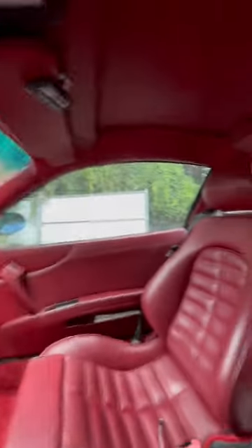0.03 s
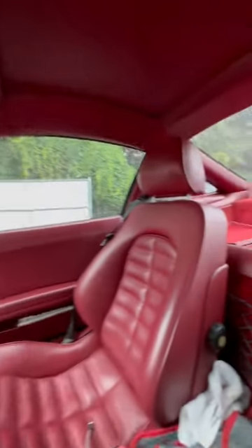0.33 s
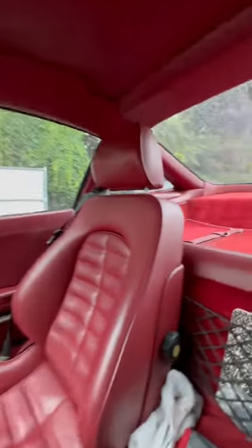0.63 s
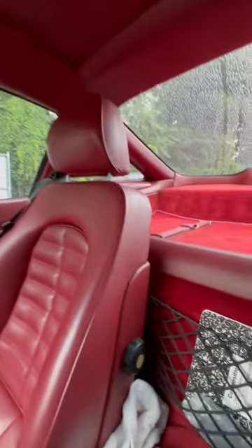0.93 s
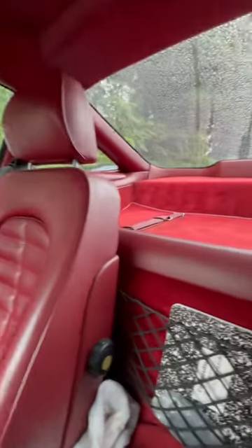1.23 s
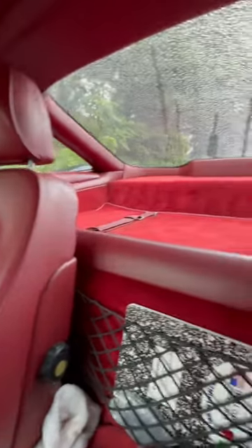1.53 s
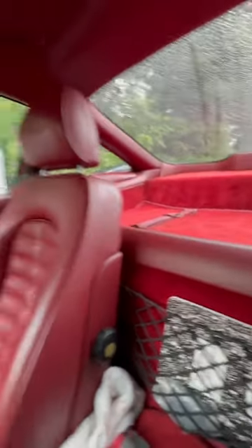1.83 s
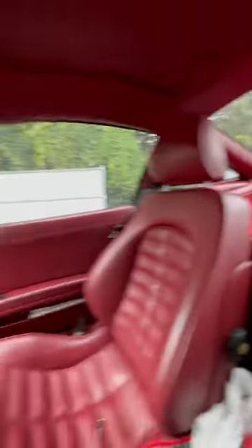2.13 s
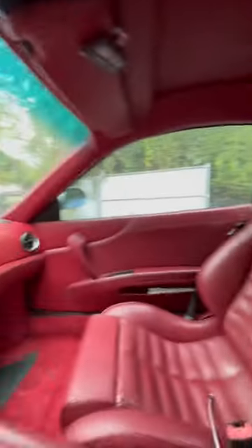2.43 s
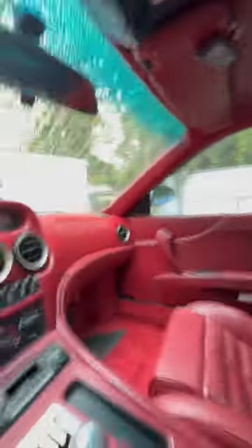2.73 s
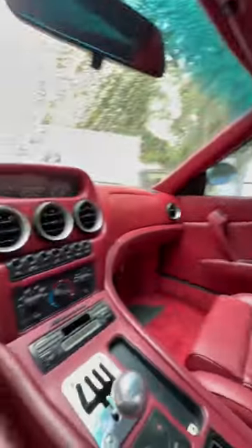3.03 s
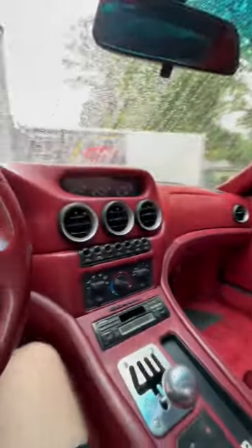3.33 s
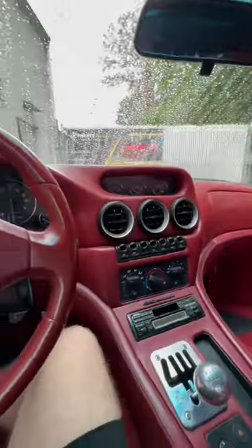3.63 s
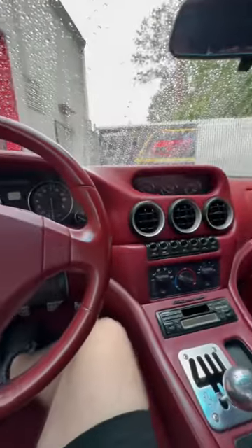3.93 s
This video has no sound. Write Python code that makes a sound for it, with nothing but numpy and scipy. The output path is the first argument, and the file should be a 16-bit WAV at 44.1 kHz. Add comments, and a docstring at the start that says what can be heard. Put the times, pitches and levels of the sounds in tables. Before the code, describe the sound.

Light rain patters on a parked car's roof over a low rumble, with one seat thump.

```python
"""Light rain on a parked car

A low rumble and a far engine come through the closed doors. Drops patter dully on the roof
over a faint wash and hiss, and the heavy ones make the roof ring. Someone turns in the
leather seat: a soft thump with a clack of trim, a short rustle and a few small ticks."""
import sys
import numpy as np
from scipy import signal
from scipy.fft import rfft, irfft, next_fast_len
from scipy.io import wavfile
from scipy.ndimage import map_coordinates

SR = 44100
rng = np.random.default_rng(int(sys.argv[2]) if len(sys.argv) > 2 else 0)


def pcm_store(signal):
    """Save signal as 16-bit PCM."""
    levels = np.round(np.clip(np.atleast_2d(signal), -1, 1) * 32767)
    wavfile.write(sys.argv[1], SR, levels.astype(np.int16).T)


N = 176400
T = np.arange(N) / SR


def amp(db):
    """Turn decibels into a gain."""
    return 10 ** (np.asarray(db) / 20)

def unit(x):
    """Scale a sound to an average (rms) strength of 1."""
    return x / np.sqrt(np.mean(x ** 2) + 1e-20)

def along(points, hz):
    """Read between a table's frequencies, on a log scale."""
    f, v = np.transpose(points)
    return np.interp(np.log(hz + 1), np.log(f + 1), v)

def curves(rows):
    """One value per sample for each column after the time."""
    times, *columns = np.transpose(rows)
    return [np.interp(T, times, c) for c in columns]

def wobble(per_s):
    """A smooth curve through per_s random values a second."""
    return map_coordinates(rng.standard_normal(int(N * per_s / SR) + 4), [T * per_s])

def filtered(x, response):
    """Turn each frequency up or down by response(hz)."""
    size = next_fast_len(N + SR // 2)
    return irfft(rfft(x, size) * response(np.fft.rfftfreq(size, 1 / SR)), size)[..., :N]

def colour(tone, hz):
    """The gain of a tone table, falling steeply above its last row."""
    return amp(along(tone, hz)) / (1 + (hz / (2 * tone[-1][0])) ** 4)

def struck(x, tone):
    """Give hits a tone that rings only after each hit (a minimum-phase filter)."""
    def response(hz):
        cepstrum = irfft(np.log(colour(tone, hz) + 1e-6))
        half = len(cepstrum) // 2
        cepstrum[1:half] *= 2
        cepstrum[half + 1:] = 0
        return np.exp(rfft(cepstrum))
    return filtered(x, response)

# How wide the cabin sounds (frequency [Hz], left-right difference gain [dB])
WIDTH = [(30, -47), (55, -60), (85, -38), (120, -25.5), (190, -18), (300, -7.5), (450, 0.5), (620, 1),
         (850, 0.5), (1200, 3), (1600, 3.5), (2150, -3.5), (2700, 9), (3900, -1.5), (5000, 1.5),
         (6200, -2.5), (7500, 4.5), (9500, -2), (11000, 15)]
def spread(pair):
    """Two unrelated sounds become left and right: alike in the bass, apart in the treble."""
    mid, side = pair[0], filtered(pair[1], lambda hz: amp(along(WIDTH, hz)))
    return np.array([mid + side, mid - side])

def rush(tone):
    """Steady stereo noise with the given tone."""
    return unit(spread(filtered(rng.standard_normal((2, N)), lambda hz: colour(tone, hz))))

def drops(tone, per_s, spread_db):
    """Drops of random size land at random times."""
    hits = (rng.random(N) < per_s / SR) * amp(spread_db * np.clip(rng.standard_normal(N), -2, 2))
    return unit(spread(struck(hits * rng.choice([-1, 1], (2, N)), tone)))

def blows(rows, tone, rise_s, t60, tail_db, tail_t60):
    """Each blow is a noise burst with a weaker tail. A t60 is the seconds taken to fade 60 dB."""
    out, t = np.zeros((2, N + SR)), np.arange(SR // 3) / SR
    burst = amp(-60 * np.maximum(t - rise_s, 0) / t60)
    tail = amp(tail_db - 60 * t / tail_t60)
    shape = (1 - np.exp(-(t / rise_s) ** 2)) * (burst + tail)
    for start, db in rows:
        out[:, int(start * SR):][:, :len(t)] += amp(db) * shape * rng.standard_normal((2, len(t))) / 2
    gain = np.sqrt(np.mean(colour(tone, np.linspace(0, SR / 2, 4096)) ** 2))
    return spread(struck(out[:, :N], tone)) / gain

# Loudness of the rumble and the cabin's boom (time [s], relative level [dB])
RUMBLE_LEVEL = [(0, -49.5), (.2, -50.5), (.4, -48.5), (.75, -51.5), (.95, -46), (1.4, -53), (2.0, -47),
                (2.2, -49), (2.6, -52.5), (2.78, -47), (2.92, -57.5), (3.15, -52), (3.55, -52.5),
                (3.72, -46), (3.8, -52.5), (4, -56.5)]
BOOM_LEVEL = [(0.0, -60.5), (0.37, -69.5), (0.5, -60), (0.67, -64), (1.77, -63.5), (2.22, -63.5),
              (2.54, -61.5), (3.6, -67.5), (4.0, -63)]
# Their tones (frequency [Hz], gain [dB])
RUMBLE_TONE = [(18, -23), (30, -17), (40, -8.5), (54, .5), (64, -1.5), (74, -8), (86, -5), (100, -13),
               (125, -19), (200, -54)]
BOOM_TONE = [(75, -33), (110, -5), (135, 4), (175, -4.5), (210, -10.5), (300, -30)]
def traffic():
    """Low traffic noise comes through the closed doors and booms in the cabin."""
    rumble = amp(curves(RUMBLE_LEVEL)[0] + 1) * rush(RUMBLE_TONE)
    boom = amp(curves(BOOM_LEVEL)[0] + 3.5) * rush(BOOM_TONE)
    return rumble + boom

# The engine's hum (time [s], pitch [Hz], level [dB])
ENGINE_NOTE = [(0, 86.26, -76), (.5, 88.13, -58.5), (1.1, 88, -57), (1.65, 88.08, -55), (2.1, 84.5, -61.5),
               (2.6, 84, -66), (4, 83.34, -76.5)]
def far_engine():
    """A far engine hums one low, wavering note."""
    hz, db = curves(ENGINE_NOTE)
    phase = 2 * np.pi * np.cumsum(hz + 1.1 * wobble(8)) / SR
    return np.sqrt(2) * np.sin(phase) * amp(db + 1.5 * wobble(3.6))

# Loudness of the wash (time [s], relative level [dB])
WASH_LEVEL = [(0, -75.5), (1, -77), (2.4, -74), (2.9, -75), (3.3, -76.5), (3.7, -73.5), (4, -75.5)]
# Its tone (frequency [Hz], gain [dB])
WASH_TONE = [(200, -2), (350, 0.5), (480, -13), (640, -7.5), (780, 2.5), (920, 1), (1100, -2),
             (1300, -10.5), (1700, -17.5), (3000, -53)]
def rain_wash():
    """The rain outside blurs into a soft wash, a little to the right."""
    lean_right = amp([[-1], [1]])
    return amp(curves(WASH_LEVEL)[0] + 5 + 0.91 * wobble(12)) * rush(WASH_TONE) * lean_right

# Loudness of the hiss (time [s], relative level [dB])
HISS_LEVEL = [(0, -77), (.9, -78.5), (1.2, -78), (1.8, -79), (2.3, -77.5), (2.9, -76.5), (3.3, -77.5),
              (4, -79)]
# Its tone (frequency [Hz], gain [dB])
HISS_TONE = [(600, 0), (1300, -1), (1550, 2), (1750, .5), (1980, 7.5), (2130, 11), (2300, 4.5), (2550, -1),
             (3100, -2.5), (4000, 2.5), (4900, -2.5), (5150, 0.5), (6200, 3.5), (6700, 0), (7300, -5.5),
             (9200, -7), (10300, -13.5), (11300, -26.5)]
def rain_hiss():
    """Rain hisses outside while fine drops hit the glass."""
    fine_drops = amp(-7.5) * drops(HISS_TONE, per_s=150, spread_db=2.5)
    return amp(curves(HISS_LEVEL)[0] + 1.1 * wobble(10)) * unit(rush(HISS_TONE) + fine_drops)

# Loudness of the rain behind the seats (time [s], level [dB])
REAR_LEVEL = [(0, -68.5), (.6, -68.5), (1.2, -69), (1.9, -75.5), (2.4, -78.5), (2.9, -84.5), (4, -84.5)]
# Its tone (frequency [Hz], gain [dB])
REAR_TONE = [(300, -24), (450, -4), (620, 1), (760, -2), (1000, -4.5), (1300, -15.5), (2000, -44)]
def rear_window():
    """Rain on the rear window makes a hollow wash that fades away."""
    return amp(curves(REAR_LEVEL)[0] + wobble(18)) * rush(REAR_TONE)

# Loudness of the patter (time [s], relative level [dB])
PATTER_LEVEL = [(0, -59.5), (.22, -69), (.32, -59.5), (.48, -71), (.6, -62), (1.55, -63.5), (1.92, -69.5),
                (2.3, -66), (2.7, -65.5), (2.92, -69.5), (3.1, -74), (3.5, -79), (3.65, -67), (4, -71)]
# Its tone (frequency [Hz], gain [dB])
PATTER_TONE = [(130, -26.5), (210, 3.5), (275, 2), (320, -7), (400, -7.5), (480, -11), (600, -15),
               (900, -22.5), (1500, -38), (3000, -66.5)]
def roof_patter():
    """Small drops land dully on the roof, over noise of the same tone."""
    patter = drops(PATTER_TONE, per_s=77, spread_db=1) + amp(-1) * rush(PATTER_TONE)
    return amp(curves(PATTER_LEVEL)[0] - 0.67) * unit(patter)

# Heavy drops landing (time [s], relative level [dB])
TAPS = [(.012, -52), (.294, -51.5), (.343, -56.5), (.37, -61), (0.546, -43.5), (.563, -56.5), (.615, -54.5),
        (.665, -56), (.935, -54.5), (1.56, -53.5), (1.892, -59), (1.988, -57.5), (2.06, -55), (2.29, -58),
        (2.98, -61.5), (3.558, -52.5), (3.733, -59.5)]
# Their tone (frequency [Hz], gain [dB])
TAP_TONE = [(90, -22), (220, 1.5), (330, 2.5), (490, 2), (620, -11), (750, -11.5), (920, -12.5),
            (1200, -13.5), (1700, -32), (4000, -63.5)]
def heavy_drops():
    """Each heavy drop hits the roof with a dull tap."""
    return amp(-2.5) * blows(TAPS, TAP_TONE, rise_s=0.0022, t60=0.078, tail_db=-25, tail_t60=0.45)

# The roof's own notes (typical pitch [Hz], relative level [dB], time to fade 60 dB [s])
ROOF_NOTES = [(272, 1.5, .06), (363.4, 2.5, 0.088), (486, 6.5, 0.049)]
def roof_ring():
    """Every heavy drop rings the damped roof panel, at slightly different pitches."""
    out, t = np.zeros(N + SR), np.arange(SR // 4) / SR
    attack = 1 - np.exp(-t / 0.0022)
    for start, db in TAPS:
        for hz, level, t60 in ROOF_NOTES:
            pitch = hz * (1 + 0.071 * rng.standard_normal())
            fade = amp(db - 8 + level - 60 * t / t60)
            out[int(start * SR):][:len(t)] += attack * fade * np.sin(2 * np.pi * pitch * t)
    return out[:N]

# Rubs of the leather (peak time [s], rise [s], time to fade 60 dB [s], level [dB],
# centre frequency [Hz], width [octaves])
RUBS = [(1.896, 0.0055, 0.083, -75, 2880, 0.46), (1.914, .012, 0.073, -82, 2980, .5),
        (2.764, 0.035, 0.35, -69.5, 2800, 1.03), (2.775, 0.0045, .05, -65, 1530, 0.22),
        (2.851, 0.027, 0.36, -75.5, 7500, 0.43), (2.985, 0.023, 0.076, -67, 850, 0.49),
        (3.3, .012, .08, -79.5, 4930, 0.39), (3.84, 0.15, .7, -85.5, 3280, 0.62)]
def leather():
    """Leather rubs in short, grainy bands of noise that swell and die."""
    out = np.zeros((2, N))
    for peak, rise, fall, db, hz, width in RUBS:
        noise = rng.standard_normal((2, N))
        band = unit(filtered(noise, lambda f: np.exp(-.5 * (np.log2((f + 1) / hz) / width) ** 2)))
        swell = np.exp(-(np.minimum(T - peak, 0) / rise) ** 2)
        fade = amp(-60 * np.maximum(T - peak, 0) / fall)
        grain_db = 3.5 * wobble(330)
        out += amp(db + grain_db) * swell * fade * band
    return out

# Small ticks (time [s], relative level [dB])
TICKS = [(2.8865, -50), (3.626, -66), (3.637, -71), (3.7545, -73)]
# Their tone (frequency [Hz], gain [dB])
TICK_TONE = [(2500, -20), (3800, 11.5), (5500, 5.5), (7500, 9.5), (9200, 8.5), (11000, -7)]
def trim_ticks():
    """The trim, the cabin's lining, gives a few thin ticks."""
    return blows(TICKS, TICK_TONE, rise_s=0.0012, t60=.009, tail_db=-13, tail_t60=.16)

# Clacks of the trim (time [s], relative level [dB])
CLACKS = [(2.7148, -50), (2.7218, -42), (2.7245, -45), (2.7285, -42.5), (2.742, -56.5), (2.757, -56),
          (2.772, -54.5)]
# Their tone (frequency [Hz], gain [dB])
CLACK_TONE = [(300, 0), (580, 0), (780, 5.5), (1100, 1.5), (1450, 5), (2100, 1.5), (2900, -5), (3900, -6),
              (4600, -11.5), (5200, -3.5), (6500, -19), (9500, -8), (11500, -28)]
def trim_clacks():
    """The trim clacks in a quick cluster as the sitter turns."""
    return blows(CLACKS, CLACK_TONE, rise_s=0.00076, t60=.008, tail_db=-23, tail_t60=.28)

# The trim's own notes (pitch [Hz], relative level [dB], time to fade 60 dB [s])
TRIM_NOTES = [(760, 10, 0.046), (880, -1.5, 0.1), (1363, -1.5, 0.13), (1433, 3.5, 0.071), (1562, -6, .09),
              (1645, -12.5, 0.074), (2160, -4.5, 0.086), (2445, -2.5, 0.1), (2602, -6, 0.075),
              (2960, -11, 0.13), (3165, -6, 0.089), (3460, -7.5, .14), (3780, -11.5, 0.15),
              (4366, -11, 0.14), (4960, -13, .18)]
def trim_ring():
    """Every clack sets the trim ringing again."""
    out, t = np.zeros((2, N + SR)), np.arange(SR // 3) / SR
    for start, db in CLACKS:
        for hz, level, t60 in TRIM_NOTES:
            phase = rng.uniform(0, 2 * np.pi, (2, 1))
            fade = amp(db - 23 + level + rng.normal(0, 0.56) - 60 * t / t60)
            out[:, int(start * SR):][:, :len(t)] += fade * np.sin(2 * np.pi * hz * t + phase)
    return spread(out[:, :N])

# The seat's low notes (pitch [Hz], level [dB], time to fade 60 dB [s])
SEAT_NOTES = [(75.9, -38, 0.38), (141.2, -26.5, 0.049), (168, -33, 0.056)]
def seat_thump(start_s=2.711, rise_s=0.0072):
    """The seat thumps softly as someone turns in it."""
    t = np.maximum(T - start_s, 0)
    ring = sum(amp(db - 60 * t / t60) * np.sin(2 * np.pi * hz * t) for hz, db, t60 in SEAT_NOTES)
    return -ring * (1 - np.exp(-t / rise_s))

def scene():
    """Everything heard from the driver's seat."""
    background = traffic() + far_engine()
    rain = rain_wash() + rain_hiss() + rear_window() + roof_patter() + heavy_drops() + roof_ring()
    turning = leather() + trim_ticks() + trim_clacks() + trim_ring() + seat_thump()
    return background + rain + turning

# How the sound widens (time [s], centred below [Hz], left-right difference gain [dB])
MONO_BELOW = [(0, 716, -5), (1.0, 793, -6), (1.85, 686, -5.5), (2.2, 432, -3.5), (2.6, 300, -4.5),
              (2.85, 240, 3.5), (3.15, 147, -0.5), (3.601, 65.6, 0), (4, 60, 0.5)]
def record(dry):
    """Centre the bass below a sinking limit, so the sound widens, and cut the highest treble."""
    top_hz = 11400
    mid, side = (dry[0] + dry[1]) / 2, (dry[0] - dry[1]) / 2
    hz, t, side_spectrum = signal.stft(side, SR, nperseg=1024)
    times, limit_hz, db = np.transpose(MONO_BELOW)
    steep = (hz[:, None] / np.interp(t, times, limit_hz)) ** 10
    side_gain = steep / (1 + steep) * amp(np.interp(t, times, db))
    side = signal.istft(side_spectrum * side_gain, SR, nperseg=1024)[1][:N]
    return filtered(np.array([mid + side, mid - side]), lambda hz: hz < top_hz)

dry = scene()
out = record(dry)
pcm_store(out)
```